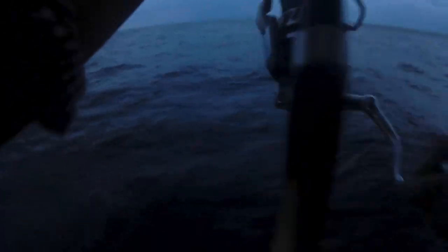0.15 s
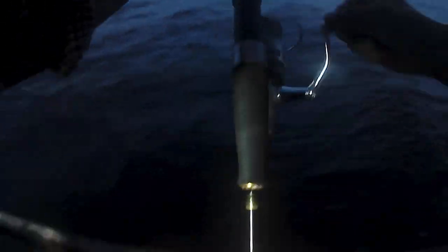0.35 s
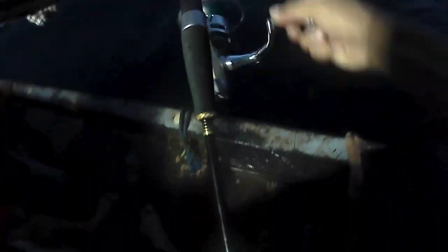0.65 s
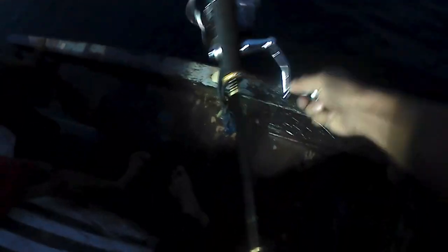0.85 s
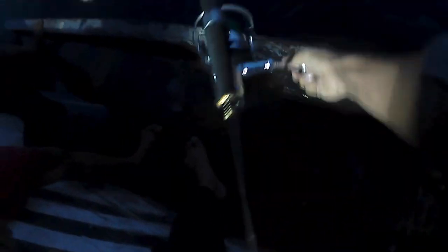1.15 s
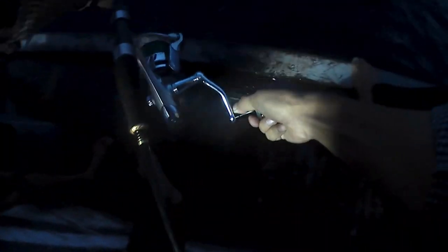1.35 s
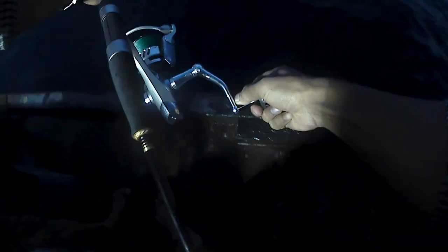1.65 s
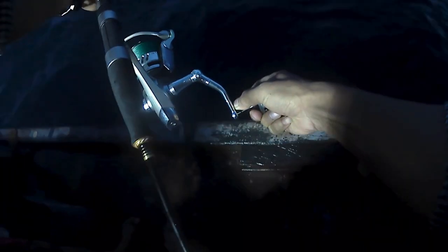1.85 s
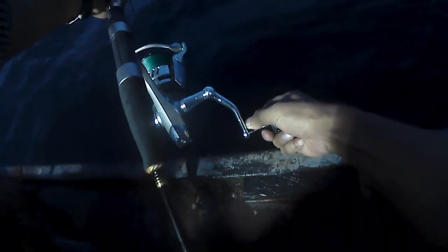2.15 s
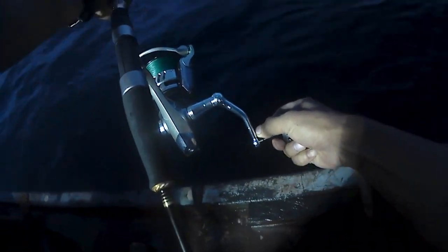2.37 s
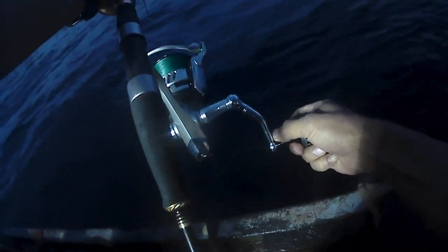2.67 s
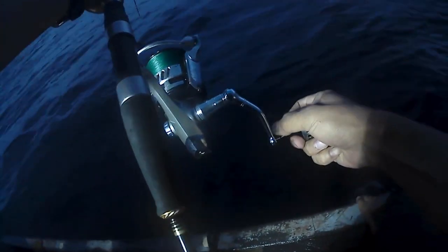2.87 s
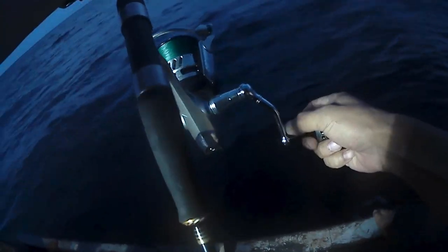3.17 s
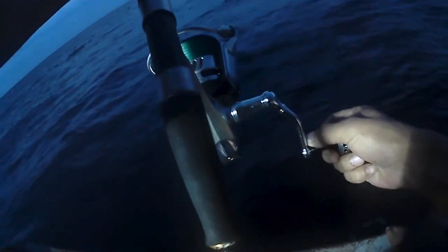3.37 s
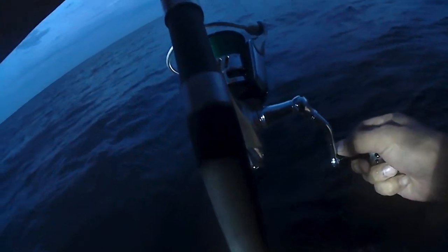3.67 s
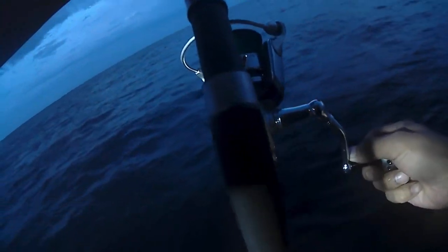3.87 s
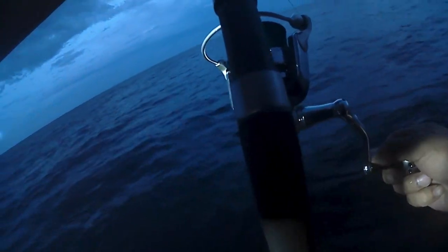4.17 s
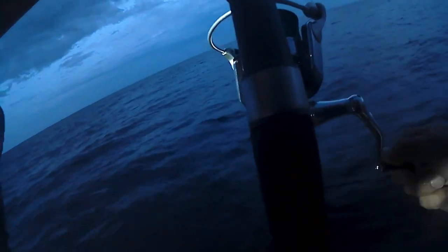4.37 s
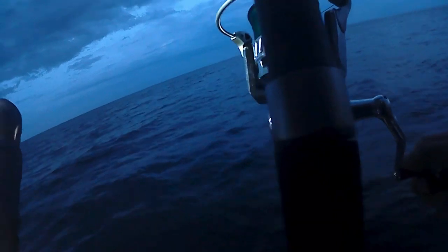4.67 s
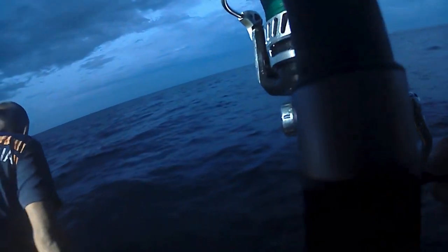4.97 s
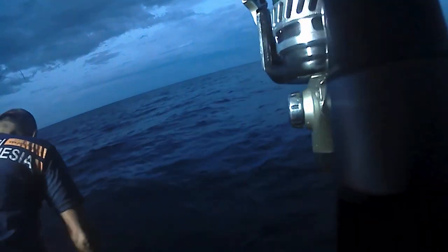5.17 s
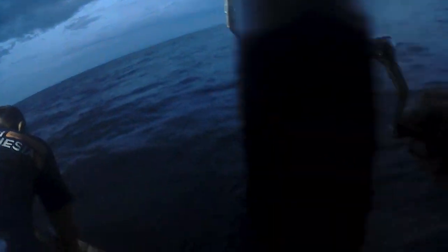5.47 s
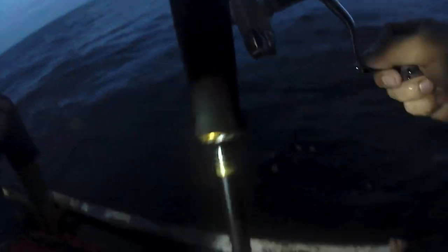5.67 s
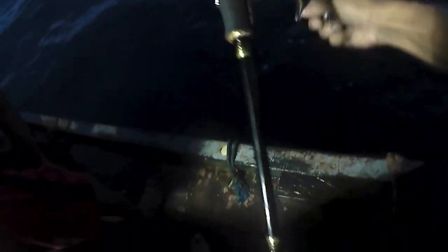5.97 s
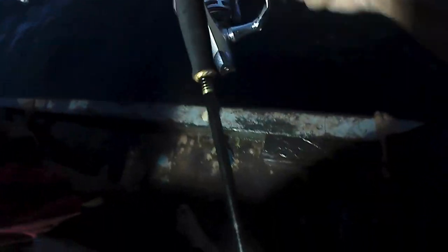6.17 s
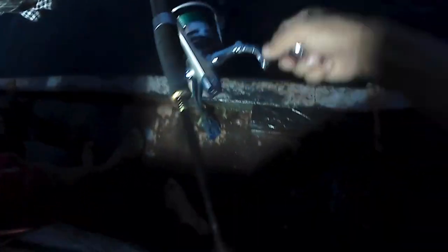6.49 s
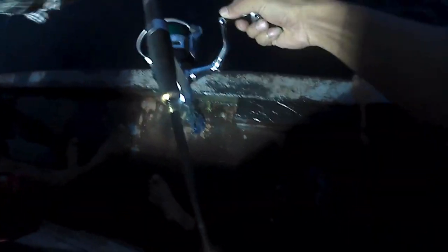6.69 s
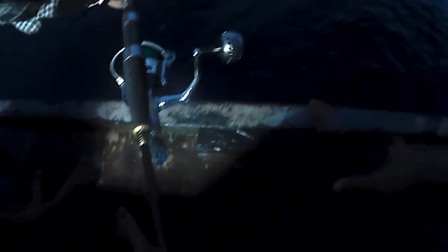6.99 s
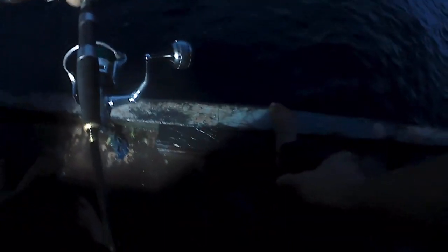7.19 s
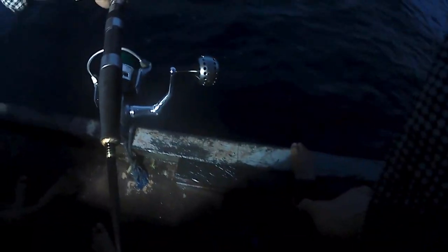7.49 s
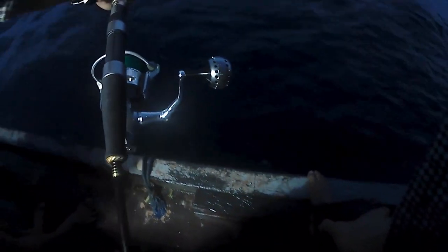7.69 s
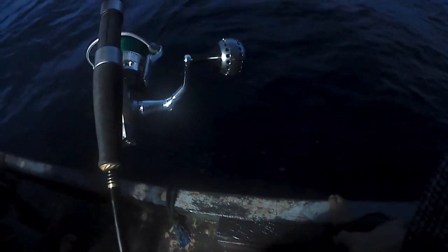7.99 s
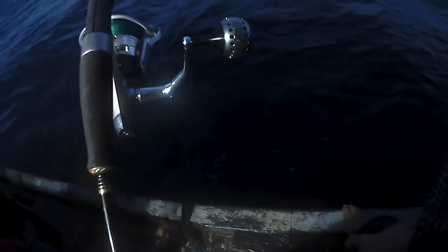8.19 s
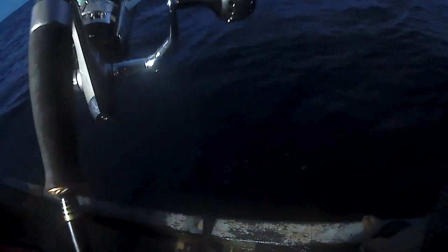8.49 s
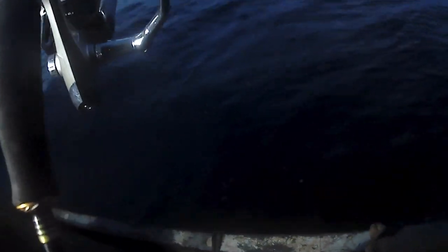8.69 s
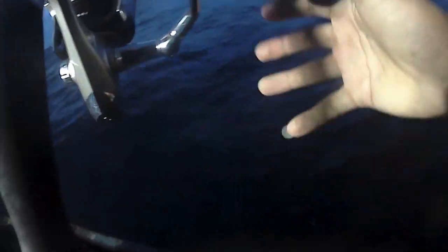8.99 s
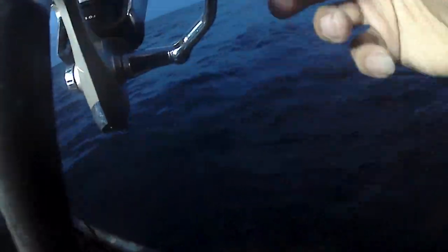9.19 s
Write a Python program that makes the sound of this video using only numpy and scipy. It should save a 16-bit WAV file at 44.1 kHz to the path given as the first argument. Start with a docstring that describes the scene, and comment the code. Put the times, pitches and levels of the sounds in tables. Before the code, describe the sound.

Close knocks and cloth rubbing on a body-worn microphone open over sloshing water and the faint winding of a fishing reel. Things quieten to a dull sea wash, then wind thumps build and plastic scrapes in short strokes. The reel rasps softly again as waves slap and clop against the small boat's hull. Sharp clicks, low thumps and one soft falling creak from the microphone mount come near the end.

```python
"""Water churns and slaps against the hull of a small boat drifting on open water at night.
Each slap booms in the hull, clops in trapped air and splashes. Wind buffets a body-worn microphone.
As the angler moves, its waterproof housing rubs on cloth, rings, and knocks, scrapes and creaks
on its mount. A fishing reel rasps softly in two bouts of winding."""
import sys
import numpy as np
from scipy import signal
from scipy.fft import rfft, irfft
from scipy.io import wavfile
from scipy.ndimage import uniform_filter1d

SR = 44100
rng = np.random.default_rng(int(sys.argv[2]) if len(sys.argv) > 2 else 0)


def digitize_waveform(pressure):
    """Quantize a signal to 16-bit integers and store it at the path in sys.argv[1].

    Rows of a 2-D input are taken as channels; values are limited to [-1, 1].
    """
    field = np.atleast_2d(pressure).T
    bounded = np.clip(field, -1, 1)
    quanta = np.round(bounded * 32767).astype(np.int16)
    wavfile.write(sys.argv[1], SR, quanta)


N = 411894
TAPS = 16384
HZ = np.maximum(np.arange(TAPS // 2 + 1) * SR / TAPS, 1)
TIME = np.arange(N) / SR


def undb(db):
    """Decibels to gain."""
    return 10 ** (np.asarray(db) / 20)


def unit(x):
    """Scale to rms 1."""
    return x / np.sqrt(np.mean(x ** 2))


def add(out, start_s, sound):
    """Mix a sound into out."""
    i = max(int(start_s * SR), 0)
    out[i:i + len(sound)] += sound[:max(N - i, 0)]


def swell(rows, fade_s=0.03):
    """Gain over time through (s, dB) rows, fading out beyond them."""
    s, db = np.transpose(rows)
    inside_s = np.minimum(TIME - s[0], s[-1] - TIME)
    return undb(np.interp(TIME, s, db)) * np.clip(inside_s / fade_s + 1, 0, 1)


def strokes(rows, rise_s, fall_s):
    """Gain over time from (start s, length s, dB) rows: each builds, holds and decays."""
    power = np.zeros(N)
    for start_s, length_s, db in rows:
        t = TIME[:int((length_s + 8 * fall_s) * SR)]
        attack = 1 - np.exp(-t / rise_s)
        release = np.exp(-np.maximum(t - length_s, 0) / fall_s)
        add(power, start_s, (undb(db) * attack * release) ** 2)
    return np.sqrt(power)


def slope(points):
    """Gain per frequency through (Hz, dB) points."""
    hz, db = np.transpose(points)
    return undb(np.interp(np.log(HZ), np.log(hz), db))


def peaks(modes):
    """Gain per frequency of steep-sided resonances."""
    power = sum(undb(2 * db) / (1 + ((HZ - hz) / width_hz * 1.363) ** 2) ** 4
                for hz, width_hz, db in modes)
    return np.sqrt(power)


def response(gain):
    """Minimum-phase impulse response for a gain per frequency."""
    cepstrum = irfft(np.log(gain + 1e-7))
    cepstrum[1:TAPS // 2] *= 2
    cepstrum[TAPS // 2 + 1:] = 0
    return irfft(np.exp(rfft(cepstrum)))


def colour(x, gain):
    """Filter x by a gain per frequency."""
    return signal.fftconvolve(x, response(gain))[:len(x)]


def walk(rate_hz):
    """Smooth random wander, rms 1."""
    hold = max(int(SR / rate_hz), 1)
    steps = np.repeat(rng.standard_normal(N // hold + 1), hold)
    return unit(uniform_filter1d(uniform_filter1d(steps, hold), hold)[:N])


def grains(per_s):
    """Random tiny impacts of uneven size, rms 1."""
    return unit((rng.random(N) < per_s / SR) * rng.standard_normal(N))


def even(x, window_s):
    """Hold the short-term rms of a noise near 1."""
    power = uniform_filter1d(np.abs(signal.hilbert(x)) ** 2, max(int(window_s * SR), 1))
    return unit(x / np.sqrt(power + 1e-12))


# Wind strength, with a lull. Each row: time in seconds, level in dB.
WIND_GUSTS = [(0.0, -32), (0.15, -22), (0.7, -26), (1.05, -21.5), (1.35, -36.5), (3.2, -38), (4.7, -33),
              (5.3, -35), (5.7, -28.5), (7.1, -28.5), (7.4, -34.5), (8.6, -36), (9.31, -32)]
# Each row: frequency in Hz, relative level in dB.
WIND_SPECTRUM = [(4, -14), (8, 2), (13, -1), (20, -6.5), (30, -10.5), (45, -30.5), (70, -29.5),
                 (120, -35.5), (250, -48.5), (600, -102)]
# Each row: centre in seconds, level in dB.
WIND_BUFFETS = [(0.149, -36), (1.008, -34), (1.806, -33), (2.167, -32), (2.538, -26), (2.909, -30.5),
                (3.269, -28.5), (3.613, -20.5), (4.03, -27), (4.357, -23), (4.748, -19.5), (5.073, -22),
                (5.467, -17), (5.82, -20.5), (6.361, -24), (7.147, -29), (7.629, -26.5), (8.009, -26),
                (8.371, -26.5), (8.701, -21.5), (9.093, -22)]


def wind(half_width_s=0.014):
    """Eddies press on the microphone: a deep sway plus single push-pull buffets."""
    sway = colour(rng.standard_normal(N), slope(WIND_SPECTRUM))
    out = even(sway, window_s=0.079) * swell(WIND_GUSTS)
    lead_s = TIME[TAPS // 2]
    u = (TIME[:TAPS] - lead_s) / half_width_s
    buffet = np.pi * u / (1 + u ** 2) ** 2
    for centre_s, db in WIND_BUFFETS:
        add(out, centre_s - lead_s, buffet * undb(db))
    return out


# Each row: frequency in Hz, relative level in dB.
SEA_SPECTRUM = [(20, 20.5), (60, 17.5), (120, 11.5), (250, 0.5), (450, 2), (700, -2), (930, -4), (1250, -6),
                (1850, -9.5), (2200, -9), (4000, -24), (6300, -26.5), (7600, -56), (10000, -35),
                (15000, -51.5)]


def sea(level_db=-51, flicker_db=1.32):
    """Small waves all around, dulled by the housing."""
    wash = rng.standard_normal(N) * undb(flicker_db * walk(rate_hz=21))
    return unit(colour(wash, slope(SEA_SPECTRUM))) * undb(level_db)


# Each row: frequency in Hz, relative level in dB.
CHURN_SPECTRUM = [(30, -10), (60, -7.5), (100, 10), (150, -2), (240, 1.5), (315, -0.5), (380, -11),
                  (500, -16), (680, -15), (850, -23.5), (1500, -17.5), (4000, -59.5)]
# Each row: start in seconds, length in seconds, relative level in dB.
WATER_SURGES = [(0.02, 0.35, -45), (0.35, 0.35, -48), (0.74, 0.27, -44), (2.3, 0.78, -62),
                (3.15, 0.39, -55), (3.96, 0.62, -52), (4.55, .29, -47.5), (5.0, 0.05, -46.5),
                (5.35, 0.55, -50), (6.02, 0.38, -53), (6.48, 0.27, -49.5), (6.83, 0.26, -42.5),
                (7.14, 0.19, -50), (7.4, 0.36, -49.5), (7.85, 0.52, -53), (8.48, 0.2, -43.5)]


def churn(gain_db=2.5, lump_db=2, floor_db=-61.5):
    """Water surges along the hull in uneven lumps and laps softly in between."""
    lumps = grains(per_s=600) * undb(lump_db * walk(rate_hz=17))
    heave = np.hypot(strokes(WATER_SURGES, rise_s=0.027, fall_s=0.062), undb(floor_db))
    return even(colour(lumps, slope(CHURN_SPECTRUM)), window_s=0.15) * heave * undb(gain_db)


# Housing resonances. Each row: frequency in Hz, width in Hz, relative level in dB.
HOUSING_MODES = [(300, 260, -10.5), (619, 215, -1), (1184, 160, -0.5), (1457, 613, -0.5), (1820, 247, -2),
                 (2334, 1300, -18), (5250, 1200, -32), (6135, 420, -26), (6510, 700, -27),
                 (9650, 870, -31.5), (11400, 4000, -56.5), (13900, 800, -38)]
# The housing when struck. Each row: frequency in Hz, width in Hz, relative level in dB.
STRUCK_MODES = [(556, 320, -9), (1405, 454, 2.5), (1748, 360, -4.5), (2590, 990, -29.5),
                (5170, 1200, -42.5), (6420, 670, -24), (9480, 590, -31), (14450, 440, -36)]
# Each row: start in seconds, length in seconds, relative level in dB.
CLOTH_RUBS = [(0.06, 0.053, -51), (0.118, 0.2, -44.5), (0.34, 0.31, -50.5), (0.62, .06, -47.5),
              (0.73, .12, -48), (0.88, 0.11, -47), (1.04, 0.15, -49.5), (2.23, 0.051, -66),
              (2.33, 0.067, -61.5), (2.51, 0.22, -63.5), (2.8, 0.3, -64.5), (3.17, 0.39, -60.5),
              (3.9, 0.03, -54), (3.995, 0.013, -55), (4.09, .05, -51.5), (4.215, 0.018, -50),
              (4.32, 0.067, -56), (4.54, 0.012, -52.5), (5.43, 0.23, -54), (5.65, 0.21, -48.5),
              (5.925, .26, -52), (6.25, 0.079, -47), (6.36, 0.07, -53), (6.435, 0.037, -50),
              (6.72, 0.24, -53.5), (6.86, 0.24, -46.5), (7.15, 0.044, -49), (7.3, 0.019, -48.5),
              (7.48, 0.067, -53), (7.625, 0.086, -49), (7.85, .2, -55.5), (8.09, 0.15, -51),
              (8.295, 0.013, -49), (8.38, 0.11, -50.5), (8.495, 0.15, -48.5), (8.73, 0.095, -55.5)]


def rubbing(gain_db=-2.5, catch_db=3, shift_db=2, tick_db=-8, floor_db=-66):
    """Cloth sticks and slips on the housing; as the contact shifts, each resonance swells on its own."""
    catch = undb(catch_db * walk(rate_hz=72))
    ring = np.zeros(N)
    for mode in HOUSING_MODES:
        friction = rng.standard_normal(N) * catch * undb(shift_db * walk(rate_hz=30))
        ring += colour(friction, peaks([mode]))
    ticks = unit(colour(grains(per_s=90), peaks(STRUCK_MODES)))  # fibres snag and let go
    pressure = np.hypot(strokes(CLOTH_RUBS, rise_s=0.0035, fall_s=0.04), undb(floor_db))
    return (even(ring, window_s=0.086) + undb(tick_db) * ticks) * pressure * undb(gain_db)


# Each row: nominal frequency in Hz, time to fall 60 dB in seconds, relative level in dB.
MOUNT_MODES = [(79.7, 0.087, 2), (101, 0.11, -2.5), (165, 0.036, 1), (286.4, 0.078, -9)]
# Each row: start in seconds, relative click and thump levels in dB.
HOUSING_KNOCKS = [(0.0778, -41, -40), (0.1203, -35, -21), (0.175, -34, -18), (0.222, -26, -20),
                  (0.2601, -27, -22), (0.2972, -46, -35), (0.4827, -43, -36), (0.623, -32.5, -25),
                  (2.558, -45, -52), (6.4367, -41, -45), (6.861, -41, -29.5), (6.941, -36.5, -25),
                  (7.0536, -39, -27), (7.538, -49, -36), (8.0935, -41.5, -53), (8.1678, -41, -52),
                  (8.302, -45, -32), (8.431, -36.5, -55), (8.495, -29, -28), (8.533, -35.5, -40),
                  (8.6339, -36, -32), (8.663, -43, -44), (8.6841, -35.5, -39), (8.822, -38, -56),
                  (8.8602, -26, -23.5), (9.0128, -44.5, -42), (9.102, -28.5, -22), (9.206, -48, -52)]


def knocks(click_gain_db=2, thump_gain_db=1, chatter_s=0.006, lag_s=0.00081, rise_s=0.0032):
    """The housing taps its mount: a sharp click with a little chatter, then a low thump."""
    out, t = np.zeros(N), TIME[:TAPS]
    shell = response(peaks(STRUCK_MODES))
    onset = 1 - np.exp(-t / rise_s)  # the heavier mount is slow to move
    for start_s, click_db, thump_db in HOUSING_KNOCKS:
        impulse = t == 0
        chatter = 0.063 * rng.standard_normal(TAPS) * np.exp(-t / chatter_s)
        click = signal.fftconvolve(impulse + chatter, shell)
        add(out, start_s, click / np.abs(click).max() * undb(click_db + click_gain_db))
        detunes = 1 + 0.08 * rng.standard_normal(len(MOUNT_MODES))
        thump = sum(undb(db - 60 * t / t60_s) * np.sin(2 * np.pi * hz * detune * t)
                    for (hz, t60_s, db), detune in zip(MOUNT_MODES, detunes))
        add(out, start_s + lag_s, thump * onset * undb(thump_db + thump_gain_db))
    return out


# Each row: frequency in Hz, width in Hz, relative level in dB.
REEL_MODES = [(1510, 620, -9), (2120, 740, 11), (3046, 260, 6.5), (3490, 230, 5), (3840, 170, 4),
              (4244, 150, 2.5), (4550, 270, -1), (4920, 130, -2), (5700, 1400, -8), (10400, 2200, -18.5),
              (12200, 4200, -22)]
# Each row: start in seconds, length in seconds, relative level in dB.
HANDLE_PUSHES = [(0.115, 0.34, -67), (0.52, 0.26, -65.5), (0.885, 0.054, -58), (1.06, 0.051, -63),
                 (5.56, 0.075, -66.5), (5.665, 0.19, -64), (5.9, 0.17, -67), (6.08, 0.092, -61),
                 (6.22, 0.13, -65), (6.42, 0.051, -65)]


def reel(gain_db=3, flicker_db=1):
    """Gears and running line rasp in the reel body while the handle turns."""
    rasp = rng.standard_normal(N) * undb(flicker_db * walk(rate_hz=67))
    winding = strokes(HANDLE_PUSHES, rise_s=0.011, fall_s=0.027)
    return unit(colour(rasp, peaks(REEL_MODES))) * winding * undb(gain_db)


# Each row: frequency in Hz, width in Hz, relative level in dB.
HULL_MODES = [(107.5, 82, 7.5), (210, 133, 4), (286, 89, 4)]
# Air under a wavelet. Each row: frequency in Hz, width in Hz, relative level in dB.
AIR_POCKET_MODES = [(438, 177, 1.5), (640, 254, -4)]
# Each row: time in seconds, relative boom, clop and splash levels in dB.
WATER_SLAPS = [(0.485, -30, -53, -49), (0.568, -33, -43, -45), (0.624, -20, -32.5, -42),
               (0.87, -31, -47, -44), (1.056, -27, -49, -44.5), (1.163, -31, -45, -61),
               (1.288, -34, -44, -55), (2.347, -42.5, -57, -63), (3.803, -37.5, -71, -52),
               (4.036, -35, -68, -50), (4.118, -41, -62, -60), (5.469, -37, -45, -56),
               (6.039, -34, -44.5, -48), (6.094, -32.5, -48.5, -58), (6.295, -28.5, -63, -53),
               (6.43, -36, -46.5, -59), (6.631, -33.5, -43.5, -51), (6.837, -31.5, -42.5, -43),
               (6.956, -30.5, -46, -59), (7.002, -34, -47, -51), (7.054, -24.5, -38, -42),
               (7.661, -35.5, -57, -53), (7.72, -35, -52, -46), (8.384, -28, -64, -43)]


def slaps(rise_s=0.002, boom_s=0.015, clop_s=0.012, splash_s=0.013, clop_gain_db=4, splash_gain_db=3):
    """A wavelet hits: the hull booms, trapped air clops, the crest's splash rings in the housing."""
    out, t = np.zeros(N), TIME[:TAPS]
    parts = [(response(peaks(HULL_MODES)), boom_s, 0),
             (response(peaks(AIR_POCKET_MODES)), clop_s, clop_gain_db),
             (response(peaks(HOUSING_MODES)), splash_s, splash_gain_db)]
    for time_s, *levels_db in WATER_SLAPS:
        for (body, decay_s, gain_db), db in zip(parts, levels_db):
            push = (1 - np.exp(-t / rise_s)) * np.exp(-t / decay_s)
            burst = signal.fftconvolve(rng.standard_normal(TAPS) * push, body)
            add(out, time_s - rise_s, burst / np.abs(burst).max() * undb(db + gain_db))
    return out


# Each row: frequency in Hz, width in Hz, relative level in dB.
SCRAPE_MODES = [(267, 186, 4), (632, 215, -2.5), (1213, 330, -7), (1520, 260, 1.5), (1853, 160, 0.5),
                (2380, 960, -16.5), (5750, 1470, -29.5), (6350, 460, -23.5), (9800, 1050, -33),
                (14100, 1100, -39)]
# Each row: centre in seconds, length in seconds, relative level in dB.
MOUNT_SCRAPES = [(4.624, 0.028, -42.5), (4.681, 0.041, -54.5), (4.723, 0.033, -40.5), (4.803, 0.036, -49.5),
                 (4.819, 0.017, -42.5), (4.89, 0.03, -49.5), (4.965, 0.036, -49), (5.037, 0.023, -41.5),
                 (5.09, 0.025, -47), (5.173, 0.02, -48)]


def scrapes(gain_db=1.5, judder_db=2):
    """Plastic slides on plastic at the mount in short juddering strokes."""
    pressure = sum(undb(db) * np.exp(-2 * ((TIME - centre_s) / length_s) ** 2)
                   for centre_s, length_s, db in MOUNT_SCRAPES)
    slips = grains(per_s=4600) * undb(judder_db * walk(rate_hz=270))
    return even(colour(slips, peaks(SCRAPE_MODES)), window_s=0.031) * pressure * undb(gain_db)


# Each row: time in seconds, slip rate in Hz, level in dB.
MOUNT_CREAK = [(8.72, 365, -62), (8.76, 330, -50.5), (8.811, 295.4, -48), (8.85, 278, -46.5)]


def creak(octave_db=-14):
    """Regular stick-slip slows as the mount settles: one short, soft, falling tone."""
    time_s, slip_hz, db = np.transpose(MOUNT_CREAK)
    phase = 2 * np.pi * np.cumsum(np.interp(TIME, time_s, slip_hz)) / SR
    tone = np.sin(phase) + undb(octave_db) * np.sin(2 * phase)
    return unit(tone) * swell(np.c_[time_s, db])


def scene():
    """All sources sum at one microphone."""
    mix = wind() + sea() + churn() + slaps() + reel() + rubbing() + scrapes() + creak() + knocks()
    return mix[None]


def record(dry):
    """A steep low-pass cuts the top treble."""
    cutoff_hz = 15600
    return signal.sosfilt(signal.ellip(8, 0.2, 70, cutoff_hz, fs=SR, output="sos"), dry)


dry = scene()
out = record(dry)
digitize_waveform(out)
```